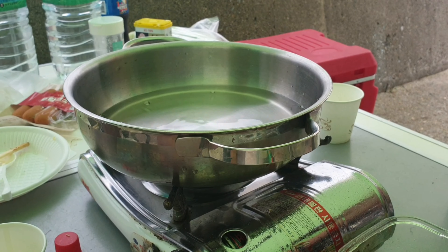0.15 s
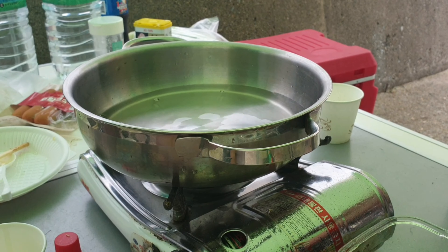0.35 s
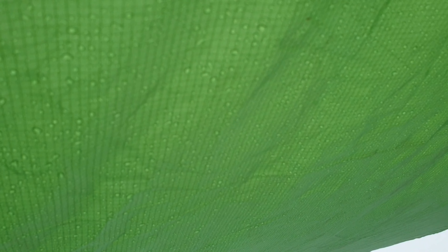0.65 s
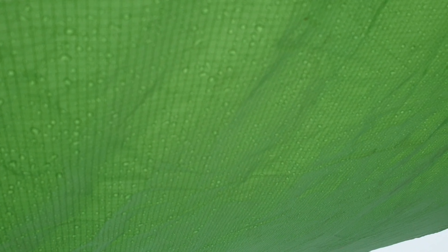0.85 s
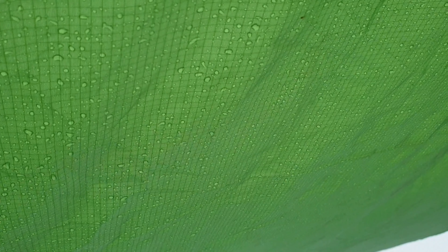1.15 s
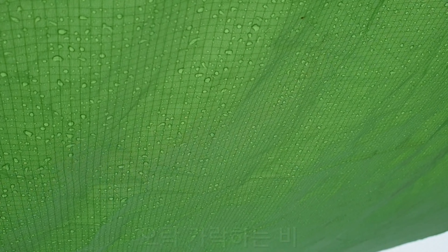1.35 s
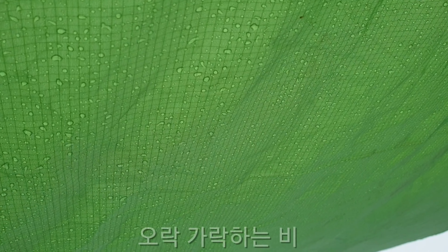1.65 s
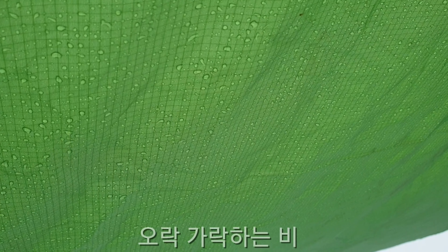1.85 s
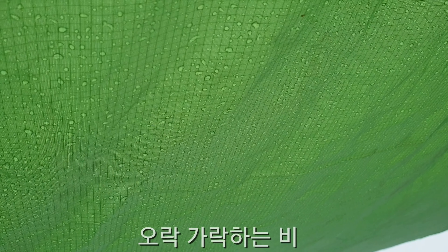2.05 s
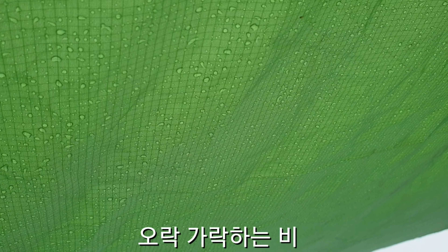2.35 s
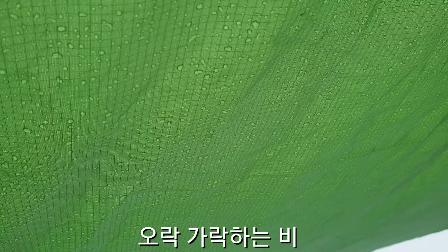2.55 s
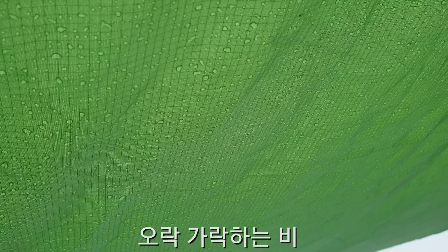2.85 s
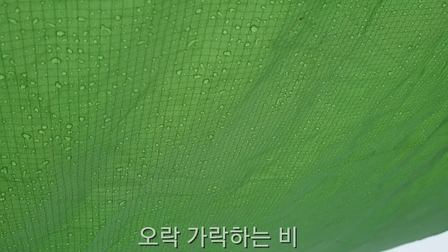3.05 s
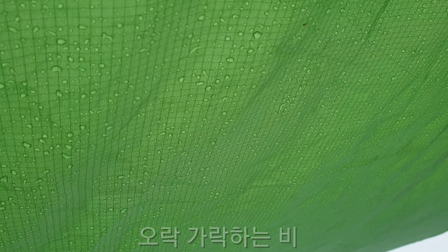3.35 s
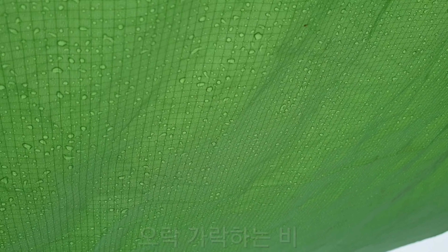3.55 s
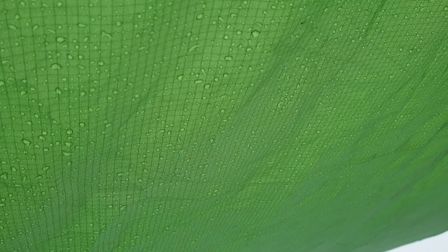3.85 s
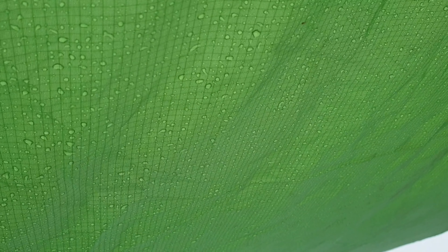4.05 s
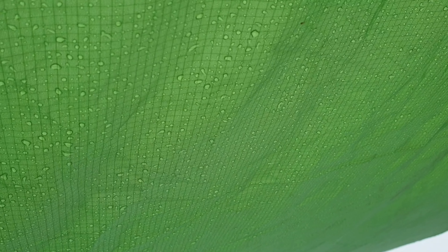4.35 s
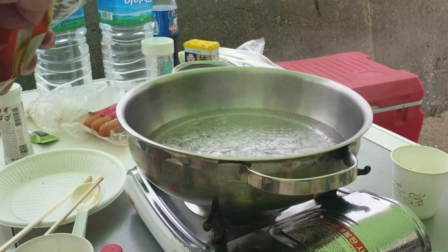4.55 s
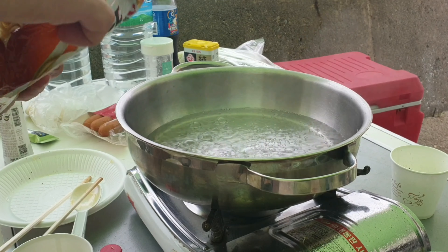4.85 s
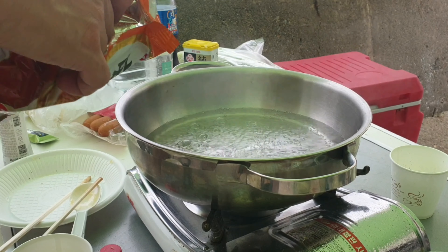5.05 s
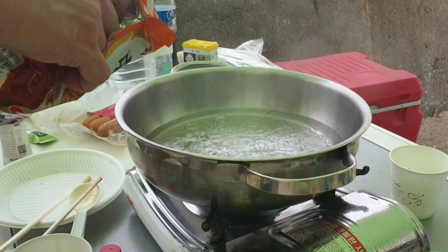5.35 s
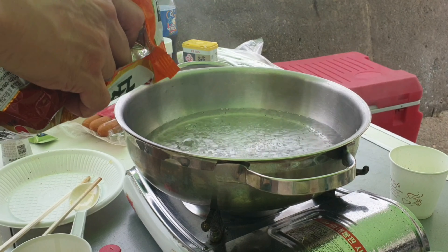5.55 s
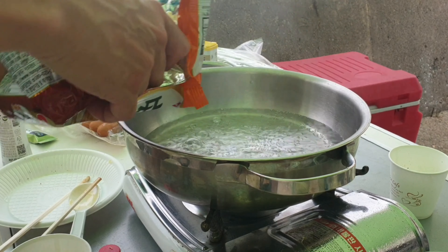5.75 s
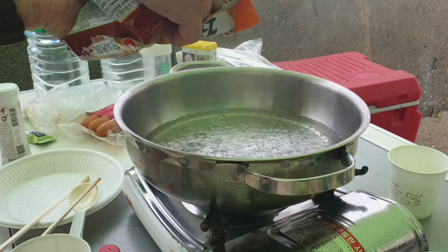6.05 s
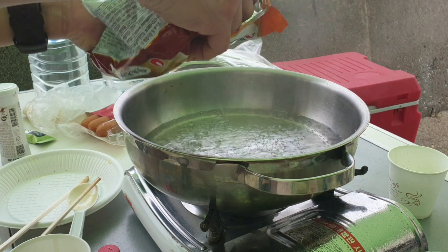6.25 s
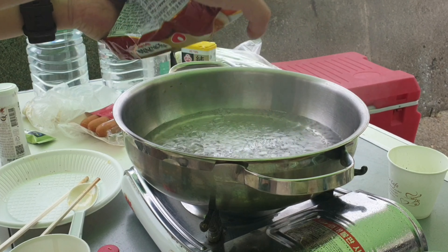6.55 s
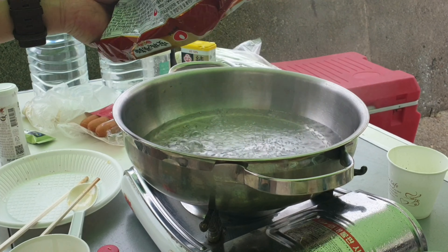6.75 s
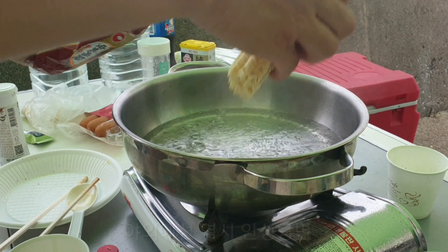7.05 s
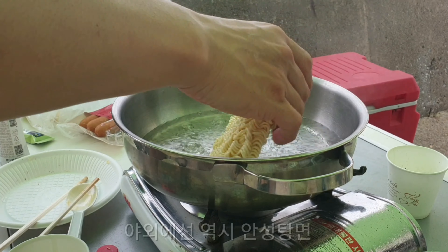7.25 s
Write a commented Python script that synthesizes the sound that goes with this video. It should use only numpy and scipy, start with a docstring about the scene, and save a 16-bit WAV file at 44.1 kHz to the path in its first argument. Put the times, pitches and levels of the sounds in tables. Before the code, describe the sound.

Outdoors in stereo, three close viewpoints join with abrupt cuts. First comes brief rain wash at a table; then faint drops beneath taut cloth, building to forceful plops, fine spray and low rumble. Finally, beside a metal pot on a gas burner, water fizzes softly while stiff film crackles in uneven squeezes. One bright tear dominates, fading into small rustles, quiet simmering and a gentle dip into water.

```python
"""A rainy camp kitchen, heard from three places in turn: at the table, close under the tarp, beside the pot.
Rain is drumming pulses and filtered noise; under the cloth its level fades up, with single drops and a low boom.
At the pot a gas burner hisses and whistles, and bubbles burst as damped tones of rising pitch.
A plastic noodle packet crinkles in clumps of tiny rings and clicks, snaps, and rips open as bursts of noise;
the hollow of the steel pot rings along, and at last the noodles meet the water with a soft slosh."""
import sys
import numpy as np
from scipy import signal
from scipy.fft import rfft, irfft, next_fast_len
from scipy.io import wavfile
from scipy.ndimage import map_coordinates

SR = 44100
rng = np.random.default_rng(int(sys.argv[2]) if len(sys.argv) > 2 else 0)


def dump_mix(stems):
    """Bounce the given channels to the path in sys.argv[1] as a 16-bit WAV at rate SR."""
    frames = np.atleast_2d(stems).T  # one column per channel
    limited = np.clip(frames, -1, 1)  # hard clip at full scale
    pcm = np.round(limited * 32767).astype(np.int16)
    wavfile.write(sys.argv[1], SR, pcm)


N = 326781
TIME = np.arange(N) / SR  # s

# when each place is heard: start and end, s
AT_TABLE, UNDER_TARP, AT_POT = (-.1, .534), (.563, 4.616), (4.637, 7.6)
REFERENCE_DB = -40  # patter level from which drops and rumble are scaled

# the patter's level fades up under the tarp; spray, lesser drops and rumble rise with it: t/s, level/dB
PATTER_LEVEL = [(0.58, -62.5), (1.1, -63), (1.55, -60.5), (2.25, -59.5), (2.92, -47), (3.42, -42),
                (4.5, -39.5), (4.6, -40.5)]
# shape of low rumble, from cloth or flame: f/Hz, level/dB
RUMBLE = [(13, -27), (22, -19), (46, -2.5), (70, 1.5), (124, -3.5), (140, -5), (210, -11), (270, -38),
          (460, -120)]
# shape of crisp film crackle: f/Hz, level/dB
CRINKLE = [(1290, -33), (2200, -6), (3140, 0), (3420, 0.5), (7030, 2.5), (8950, -3), (11100, 0.5),
           (15100, -2), (16000, -23)]
# shape of the duller rustle of wide film panels: f/Hz, level/dB
FLEX = [(200, -25), (450, -6), (650, -3), (1100, 1), (2000, -1.5), (3000, -2), (6000, -32)]


def amp(db):
    """Decibels to gain."""
    return 10 ** (np.asarray(db) / 20)


def unit(x):
    """Scale to rms 1."""
    return x / np.sqrt(np.mean(x ** 2) + 1e-20)


def along(points, hz):
    """Read (Hz, value) points on a log frequency axis."""
    f, v = np.transpose(points)
    return np.interp(np.log(hz + 1), np.log(f + 1), v)


def curves(rows):
    """One value per sample for each column after the time."""
    s, *cols = np.transpose(rows)
    return [np.interp(TIME, s, c) for c in cols]


def wobble(rate):
    """A smooth random curve with this many knots a second."""
    knots = rng.standard_normal(int(N * rate / SR) + 4)
    return map_coordinates(knots, [TIME * rate])


def pan(db):
    """Left and right gains of constant power; positive dB leans left."""
    g = amp(np.array([np.atleast_1d(db), -np.atleast_1d(db)]) / 2)
    return g / np.sqrt(np.mean(g ** 2, axis=0))


def add(track, s, sound):
    """Mix a stereo sound in at time s."""
    i = max(round(s * SR), 0)
    track[:, i:i + sound.shape[1]] += sound[:, :max(N - i, 0)]


def filtered(x, response):
    """Multiply the spectrum of x by a complex response of frequency."""
    m = next_fast_len(N + SR // 4)
    return irfft(rfft(x, m) * response(np.fft.rfftfreq(m, 1 / SR)), m)[..., :N]


def convolved(x, kernel):
    """Convolve each channel with its kernel and keep the scene's length."""
    return signal.oaconvolve(x, kernel, axes=1)[:, :N]


def colour(x, points, size=4096):
    """Causal minimum-phase filter of the given (Hz, dB) shape, made by folding the cepstrum."""
    gain = amp(along(points, np.fft.rfftfreq(size, 1 / SR)))
    cepstrum = irfft(np.log(gain + 1e-6))
    fold = np.r_[1, np.full(size // 2 - 1, 2), 1, np.zeros(size // 2 - 1)]
    kernel = irfft(np.exp(rfft(cepstrum * fold)))
    return convolved(x, kernel[None])


def heard_at(span):
    """1 while a place is heard, with steep fades outside its span."""
    fade_db_per_s = 1500
    outside = np.maximum(np.maximum(span[0] - TIME, TIME - span[1]), 0)
    return amp(-np.minimum(fade_db_per_s * outside, 200))


def noise(alike):
    """Stereo white noise whose sides share a fraction of their power, 0-1."""
    shared = np.sqrt(alike) * rng.standard_normal(N)
    return shared + np.sqrt(1 - alike) * rng.standard_normal((2, N))


def air(spectrum):
    """Diffuse noise of rms 1: nearly mono in the bass, unrelated in the treble."""
    # likeness of diffuse sound at the two microphones: f/Hz, shared power/0-1
    likeness = [(40, 1), (150, 0.86), (400, 0.67), (900, 0.09), (3000, 0.02)]
    common = filtered(noise(1.0), lambda hz: np.sqrt(along(likeness, hz)))
    separate = filtered(noise(0), lambda hz: np.sqrt(1 - along(likeness, hz)))
    return unit(colour(common + separate, spectrum))


def grains(rate, scatter_db, width_db, lead_ms=0, lag_ms=.2):
    """Random impulses of rms 1, each with its own size, side and delay between the microphones."""
    count = int(rate * N / SR)
    size, side, lag = rng.standard_normal((count, 3)).T
    at = rng.integers(0, N, count)
    late = np.round((lead_ms + lag_ms * lag) * SR / 1000).astype(int)
    left, right = amp(scatter_db * np.minimum(size, 2)) * pan(width_db * side)
    train = np.array([np.bincount(at, left, N), np.bincount((at + late) % N, right, N)])
    return unit(train - train.mean(axis=1, keepdims=True))


def pings(span, rate, low_hz, high_hz, t60, scatter_db):
    """Tiny damped rings at random times, each with its own pitch, size and side; rms 1 over the span."""
    length = span[1] - span[0]
    rows = rng.random((int(rate * length), 4))
    when, pitch, side, turn = rows.T[:, :, None]
    size = amp(scatter_db * np.minimum(rng.standard_normal(when.shape), 2))
    t = np.arange(int(t60 * SR)) / SR
    at = ((span[0] + when * length + t) * SR).astype(int).clip(0, N).ravel()
    phase = 2 * np.pi * (low_hz + pitch * (high_hz - low_hz)) * t
    fall = size * amp(-60 * t / t60)
    left = fall * amp(8.8 * (side - .5)) * np.sin(phase)
    right = fall * amp(10.5 * (.5 - side)) * np.sin(phase + 2 * np.pi * turn)
    pair = np.array([np.bincount(at, v.ravel(), N + 1)[:N] for v in (left, right)])
    return unit(pair) * np.sqrt(length * SR / N)


def arrivals(span, rate, count=100):
    """Irregular times within a span at a steady or changing rate a second."""
    due = np.cumsum(rate * heard_at(span)) / SR
    turns = np.arange(count) + rng.uniform(0, 2, count)
    return np.interp(turns[turns < due[-1]], due, TIME)


def around(x, wet_db, count=5):
    """Short reflections off table and wall: random decaying tails that take turns every 25 ms."""
    # decay of the reflections: f/Hz, t60/s
    decay = [(200, 0.044), (2000, 0.1), (12000, 0.051)]
    hz, t, z = signal.stft(rng.standard_normal((count, 2, SR // 5)), SR, nperseg=256)
    fall = amp(-60 * t / along(decay, hz)[:, None])
    tails = signal.istft(z * fall, SR, nperseg=256)[1]
    spot = (TIME * 40).astype(int) % count
    echo = np.zeros((2, N))
    for k, tail in enumerate(tails):
        echo += convolved(x * (spot == k), tail / np.linalg.norm(tail[0]))
    return x + amp(wet_db) * np.roll(echo, SR // 1000, axis=1)  # 1 ms later


def rumble():
    """Low, nearly mono rumble: the tarp's rises with the patter level; at the pot, open air and flame waver."""
    # rumble of open air and flame at the pot: t/s, level/dB
    burner = [(4.8, -50), (5.2, -46.5), (5.6, -52), (6.2, -45), (7.4, -47.5)]
    under_db, slope = -5, 0.94  # against the patter at reference level; dB per dB of patter
    tarp_db = REFERENCE_DB + under_db + slope * (curves(PATTER_LEVEL)[0] - REFERENCE_DB)
    level = amp(tarp_db) * heard_at(UNDER_TARP) + amp(curves(burner)[0]) * heard_at(AT_POT)
    return level * unit(colour(noise(0.91), RUMBLE)) * pan(-2.1)


def billow():
    """The laden cloth heaves once: a low boom that fades slowly."""
    start_s, level_db, fade_db_per_s = 3.28, -41, 17
    t = np.maximum(TIME - start_s, 0)
    boom = amp(level_db - fade_db_per_s * t) * (1 - np.exp(-t / .02))
    return boom * unit(colour(noise(0.92), RUMBLE)) * pan(-2.2)


def push(contact_ms, size=400):
    """A drop pushes the cloth: a sharp pressure peak, then a slower suction."""
    u = np.arange(size) / SR * 1000 / contact_ms
    pulse = u * (1 - u / 2) * np.exp(-u)
    return pulse / pulse.max()


def drumming(rate, scatter_db):
    """Many drops on the cloth; the big slow ones sound dull, the small ones bright."""
    sizes = [(.22, -1.5), (0.094, -4.0), (0.057, -2.5)]  # contact time/ms, level/dB
    total = np.zeros((2, N))
    for contact_ms, db in sizes:
        hits = grains(rate, scatter_db, 3.2, lead_ms=.25)
        total += amp(db) * unit(convolved(hits, push(contact_ms)[None]))
    return unit(total)


def table_rain():
    """Rain heard from the table: a low wash, with drumming overhead that gets a little louder."""
    # shape of the wash: f/Hz, level/dB
    wash_shape = [(15, -35), (25, -10), (120, 0), (326, -13.5), (659, -8), (887, -13), (1290, -8),
                  (1440, -19), (1740, -13.5), (3520, -20), (7310, -20), (8360, -24.5), (14000, -22.5),
                  (16000, -31)]
    louder = amp(np.interp(TIME, AT_TABLE, [-2, 2]))
    wash = amp(-38.0 + 1.2 * wobble(32.0)) * air(wash_shape)
    drums = amp(-44.0) * drumming(rate=60, scatter_db=5.0)
    rings = amp(-54.0) * pings(AT_TABLE, 150, 520, 1640, t60=0.017, scatter_db=12)
    return (wash + (drums + rings) * louder) * pan(-1.5) * heard_at(AT_TABLE)


def lesser_drops(count=100):
    """Random drops, in the form of the heavy ones: their rate and level rise with the patter level."""
    rate, rate_slope, level_slope = 17, .35, 0.76  # a second at reference level; dB per dB of patter
    level_db, spread_db, splash_db = -20, 2, -6  # at reference level; scatter; splash against the push
    usual_contact_ms, side_db, side_spread_db = 0.11, -4.5, 3.5
    patter_db = curves(PATTER_LEVEL)[0] - REFERENCE_DB
    chance = rng.standard_normal((count, 4)).clip(-2, 2)
    times = arrivals(UNDER_TARP, rate * amp(rate_slope * patter_db))
    rows = []
    for s, (size, contact, splash, side) in zip(times, chance):
        db = level_db + level_slope * np.interp(s, TIME, patter_db) + spread_db * size
        contact_ms = usual_contact_ms * np.exp(.3 * contact)
        rows.append((s, db, contact_ms, db + splash_db + 3 * splash, side_db + side_spread_db * side))
    return rows


def heavy_drops():
    """Single near drops: a push on the cloth, a tick of splashing water and a smaller rebound."""
    # drops that stand out, levels and side before the trims below:
    # t/s, push level/dB, contact time/ms, splash level/dB, left over right/dB
    near_drops = [(0.2077, -17.5, 0.15, -32, -4), (0.2366, -14, 0.034, -25, -4), (0.4287, -16, 0.1, -28, 1),
                  (0.8388, -33.5, 0.1, -48, -12), (1.0643, -32.5, 0.16, -52, 0),
                  (1.2012, -27.5, 0.12, -45, 2), (1.3294, -34, 0.16, -49, -7),
                  (1.433, -31, 0.12, -34.5, -9), (1.459, -35, 0.089, -31.5, -8.5),
                  (1.5543, -35, 0.1, -46, -1), (1.7244, -34, 0.15, -34.5, 7), (1.7669, -31, 0.054, -36, -6),
                  (1.9603, -30, 0.11, -49, -3), (2.1317, -25.5, 0.14, -48, -2),
                  (2.2297, -28, 0.12, -28.5, -1), (2.38, -24, 0.17, -31.5, 0),
                  (2.4066, -26.5, 0.12, -34, 0), (2.6992, -20.5, 0.1, -32, -6), (2.744, -21, 0.11, -30, -2),
                  (2.7927, -20.5, 0.096, -29, -5), (2.965, -19.5, 0.09, -25, -9),
                  (3.027, -15.5, 0.086, -26.5, 4), (3.139, -15.5, 0.081, -23, -4),
                  (3.2227, -12, 0.095, -22, -6.5), (3.2326, -13.5, 0.1, -24, -2),
                  (3.4606, -12, 0.11, -21, -4), (3.5576, -12, 0.1, -14.5, -5),
                  (3.6181, -17.5, 0.15, -17.5, -6), (3.6746, -14, 0.13, -27, -13),
                  (3.6843, -12, 0.1, -19.5, -5), (4.039, -11, 0.1, -26, -1), (4.1164, -13, 0.061, -17.5, 1),
                  (4.1844, -19, 0.18, -19, -6), (4.3998, -12.5, 0.12, -27, -14),
                  (4.4406, -13.5, 0.066, -26, -9), (4.517, -6.5, 0.076, -20, -1)]
    out, t = np.zeros((2, N)), np.arange(700) / SR
    for s, db, contact_ms, splash_db, side_db in [*near_drops, *lesser_drops()]:
        fall = amp(-60 * t / 0.0037) + 0.48 * amp(-60 * t / 0.025)
        splash = amp(splash_db - 5.5) * rng.standard_normal((2, len(t))) * fall
        drop = (amp(db - 2.5) * push(contact_ms, size=len(t)) + splash) * pan(side_db + 4.5)
        late, rebound_s = rng.integers(4, 18), rng.uniform(.002, .006)
        # the left microphone hears it a few samples before the right
        pair = np.array([np.pad(drop[0], (0, late)), np.pad(drop[1], (late, 0))])
        add(out, s - .0003, pair)
        add(out, s + rebound_s, amp(-11) * pair)
    return out


def tarp_rain():
    """Close under the cloth: single drops, sparse stronger taps, drumming, a far wash and fine spray."""
    # shape of the far patter: f/Hz, level/dB
    patter_shape = [(88, -32.5), (150, -3.5), (352, 2.5), (496, -6.5), (601, 3.5), (671, -2.5),
                    (1150, -2.5), (4000, -7.5), (5200, -41), (8800, -120)]
    # shape of the fine spray: f/Hz, level/dB
    spray_shape = [(1200, -17), (3000, -6), (4500, 0), (7000, -2), (8500, -3), (12000, -1), (16000, -5)]
    # ringing of the right microphone port with sound from overhead: f/Hz, gain/dB
    port = [(100, 1.5), (500, 1.5), (1500, 4), (4000, 4), (5700, 10.5), (7200, 10.5), (8300, 0.5),
            (9800, 3), (11800, 7), (13500, 2.5)]
    spray_over_db = -0.8  # against the patter level
    patter_db, = curves(PATTER_LEVEL)
    wash = amp(patter_db - 1.45 + 0.81 * wobble(25.04)) * air(patter_shape)
    drums = amp(patter_db - 3.5) * drumming(rate=130, scatter_db=5.5)
    taps = amp(patter_db - 4.5) * drumming(rate=14, scatter_db=4.0)
    rings = pings(UNDER_TARP, 1200, 1870, 16000, t60=.0027, scatter_db=4.5)
    droplets = grains(2200, 3.8, 6.3) + .7 * rings + .5 * noise(0)
    spray_level = amp(patter_db + spray_over_db + 0.73 * wobble(13))
    spray = spray_level * unit(colour(droplets, spray_shape))
    # the wet cloth softens the top of every impact
    cloth = [(150, 1.0), (400, 0), (700, 0.0), (2000, -0.5), (7000, 0.0), (10000, -4), (16000, -6.0)]
    impacts = colour((drums + taps) * heard_at(UNDER_TARP) + heavy_drops(), cloth)
    left, right = around((wash + spray) * heard_at(UNDER_TARP) + impacts, wet_db=-9.5)
    return np.array([left, colour(right[None], port)[0]])


def thumps():
    """Soft, heavily damped low knocks: two tones each."""
    # thumps of the cloth, and last the noodles meeting the water: t/s, level/dB, f/Hz
    knocks = [(3.31, -25.5, 103), (3.744, -26.5, 271), (3.783, -34, 340), (7.379, -33, 170)]
    out, t = np.zeros((2, N)), np.arange(SR // 5) / SR
    for s, db, hz in knocks:
        upper = np.sin(2 * np.pi * hz * 1.37 * t + rng.uniform(0, 2 * np.pi))
        swing = np.sin(2 * np.pi * hz * t) + .5 * upper
        envelope = (1 - np.exp(-t / 0.0061)) * amp(-60 * t / 0.11)
        add(out, s, amp(db + 0.5) * swing * envelope * pan(-3.5))
    return out


def bubbles(count=300):
    """Steam bubbles burst as short damped tones with a rising pitch."""
    out, t = np.zeros((2, N)), np.arange(SR // 30) / SR
    times = rng.uniform(AT_POT[0], N / SR, size=count)
    for s, (pitch, size, side) in zip(times, rng.standard_normal((count, 3))):
        cycles = 1100 * np.exp(.6 * pitch) * t
        envelope = np.exp(-cycles / 2.1) * (1 - np.exp(-2 * cycles))
        pop = np.sin(2 * np.pi * cycles * (1 + 6 * t)) * envelope
        add(out, s, amp(-54 + 2.5 * size) * pop * pan(3 * side))
    return out


def simmer():
    """Pot and burner: bursting bubbles, a noise hiss, a fizz of damped rings and a thin unsteady whistle."""
    # shape of the burner's hiss: f/Hz, level/dB
    hiss_shape = [(120, -19), (220, 0.5), (320, 1.5), (480, -3), (650, -6.5), (850, -9.5), (1200, -10),
                  (2500, -11.5), (5000, -15.5), (7000, -14), (9000, -20.5), (12000, -18.5), (16000, -22)]
    hiss_db, whistle_db, waver_hz = -52, -71, 35
    hiss = amp(hiss_db + 1.66 * wobble(9)) * air(hiss_shape)
    fizz = amp(-64.5) * pings(AT_POT, 410, 1030, 8000, t60=0.0083, scatter_db=6)
    whistle_phase = 2 * np.pi * np.cumsum(4800 + waver_hz * wobble(90)) / SR
    whistle = amp(whistle_db + 3 * wobble(6)) * np.sin(whistle_phase) * pan(-12)
    return (bubbles() + hiss + fizz + whistle) * pan(-1.3) * heard_at(AT_POT)


def noodles():
    """The dry block is dipped into the water: a short, soft slosh of noise."""
    swell = np.exp(-((TIME - 7.388) / 0.016) ** 2)
    slosh = [(100, -13), (250, -3), (700, 1), (1200, -11), (2100, -6), (3500, -23), (9000, -24)]
    return amp(-46.5) * swell * air(slosh)


def effort():
    """Crinkle and flex levels in dB: every squeeze builds, holds and relaxes in the same way."""
    # hands squeeze and pull the packet: t/s, length/s, crinkle level/dB, flex against crinkle/dB
    squeezes = [(4.645, 0.027, -36.5, -5.5), (4.76, .05, -44.5, -3.5), (4.95, 0.11, -42, -2),
                (5.055, 0.049, -35.5, -5), (5.16, 0.056, -35.5, -5), (5.27, 0.059, -39.5, -7.5),
                (5.48, 0.018, -41.5, -6), (5.76, 0.023, -44.5, -9), (5.89, .04, -38.5, -4.5),
                (6.0, 0.084, -36, -4.5), (6.243, 0.01, -36, -15), (6.32, 0.028, -37.5, -10),
                (6.44, 0.077, -39, 0), (6.625, 0.045, -39.5, -4), (6.725, 0.026, -39.5, -2.5),
                (6.82, 0.12, -51.5, 0.5)]
    grip_db_per_s, relax_db_per_s = 343, 173
    # the packet also rustles faintly while it is turned over
    turning = (4.65, 5.53 - 4.65, -50.5, -4)
    crinkle_db = flex_db = np.full(N, -90.)
    for s, length, db, flex in [*squeezes, turning]:
        before, after = np.maximum(s - TIME, 0), np.maximum(TIME - s - length, 0)
        level = db - grip_db_per_s * before - relax_db_per_s * after
        crinkle_db = np.maximum(crinkle_db, level)
        flex_db = np.maximum(flex_db, level + flex)
    return crinkle_db, flex_db


def buckling(count=400):
    """Clumping gain: each run of buckling facets sets in at once and dies away over a steady rustle."""
    rate, t60, steady = 85, 0.052, 0.69  # runs a second, s, power of the rustle between runs
    at = (arrivals(AT_POT, rate, count=count) * SR).astype(int)
    strength = amp(5 * rng.standard_normal(count).clip(-2, 2))
    runs = np.bincount(at, strength[:len(at)], N)
    power = signal.lfilter([1], [1, -amp(-120 / (t60 * SR))], runs)
    power /= np.average(power, weights=heard_at(AT_POT))
    return np.sqrt((power + steady) / (1 + steady))


def crinkle():
    """Tiny facets of film buckle in clumps, each at its own pitch; wider panels flex with a duller rustle."""
    crinkle_db, flex_db = effort()
    clumps = buckling() * amp(0.95 * wobble(240))
    rings = pings(AT_POT, 3000, 1570, 15800, t60=0.0041, scatter_db=1.5)
    facets = rings + 0.88 * grains(1500, 2.6, 5.5) + 0.62 * noise(0)
    panels = unit(grains(1100, 4.3, 4.7) + 0.44 * noise(0))
    ticks = amp(crinkle_db - 2.6) * colour(facets, CRINKLE) * pan(0.72)
    flex = amp(flex_db - 3.5) * unit(colour(panels, FLEX)) * pan(-0.66)
    return (ticks + flex) * clumps * heard_at(AT_POT)


def small_creases(count=100):
    """Random snaps whose strength follows the squeezes."""
    rate, over_db, spread_db, usual_dull_db = 22, 3.5, 3.5, -5.5  # a second; over the crinkle; scatter
    crinkle_db = effort()[0]
    chance = rng.standard_normal((count, 3)).clip(-2, 2)
    rows = []
    for s, (size, dull, side) in zip(arrivals(AT_POT, rate), chance):
        db = np.interp(s, TIME, crinkle_db) + over_db + spread_db * size
        rows.append((s, db, usual_dull_db + 6 * dull, 3 * side))
    return rows


def snaps():
    """Larger creases flip over with a crack and a brief flutter."""
    # loudest creases, before the trims below: t/s, level/dB, dull against bright/dB, left over right/dB
    creases = [(4.6427, -35, 2, 0), (4.69, -29, -17, 2), (5.072, -28.5, -6, 4), (5.1623, -33, 3, 0),
               (5.2144, -31, -2, 2), (5.3273, -29.5, -11, 3), (5.373, -31, -24, 0), (5.4824, -35, 0, -1),
               (5.6993, -35.5, -16, 1), (5.7956, -40, -25, 3), (6.0065, -28.5, -10, 1),
               (6.207, -28, -7.5, -1), (6.237, -33, -17, -4), (6.2483, -24.5, -24, -7), (6.48, -28, 2, -1),
               (6.5204, -33, -3, -2), (6.5528, -27.5, -0.5, -2), (6.591, -32.5, -11, -1),
               (6.6192, -26, 1.5, -1), (6.721, -26.5, -1.5, 0), (6.8714, -36, 1, 1), (7.073, -42.5, 15, -1),
               (7.1225, -41, -6, 1)]
    bright, dull, t = np.zeros((2, N)), np.zeros((2, N)), np.arange(SR // 25) / SR
    for s, db, dull_db, side_db in [*creases, *small_creases()]:
        fall = 0.65 * amp(-60 * t / 0.0051) + 0.39 * amp(-60 * t / 0.038)
        crack = rng.standard_normal((2, len(t))) * fall
        crack = amp(db + 8.5) * crack * pan(side_db) / np.hypot(1, amp(dull_db))
        add(bright, s, crack)
        add(dull, s, amp(dull_db + 6.5) * crack)
    return colour(bright, CRINKLE) + colour(dull, FLEX)


def tear():
    """The seam gives way in one bright rip; the opened bag then puffs out."""
    # shape of the rip: f/Hz, level/dB
    rip_shape = [(150, -8), (600, -14.5), (2000, -3), (4500, -1.5), (7000, 1.5), (8500, -2.5), (12000, 1.5),
                 (14500, 0), (16000, -15)]
    t = np.maximum(TIME - 6.3642, 0)
    seam = (1 - np.exp(-(t / 0.0014) ** 2)) * amp(-60 * t / 0.18 + 0.87 * wobble(300))
    bag = (t / 0.016) ** 2 * np.exp(2 - 2 * t / 0.018)
    rip = amp(-11) * seam * unit(colour(grains(12000, 3, 2.6) + noise(0), rip_shape)) * pan(.8)
    puff_shape = [(60, -15), (250, -4.5), (450, -6.5), (800, 0.5), (1500, 2.5), (4000, -7), (9000, -16.5)]
    return rip + amp(-22) * bag * air(puff_shape)


def packet():
    """The packet is held over the pot, whose hollow rings along as a bank of resonances."""
    # resonances of the air in the pot: f/Hz, width/Hz, relative level/dB
    pot = [(586, 29, 4), (906, 55, -11), (1010, 78, -8), (1240, 100, -8.5), (1950, 40, -2.5),
           (2225, 64, -6), (2690, 36, -10)]

    def hollow(f):
        """Sum of band-pass resonances."""
        return sum(amp(db) * 1j * f * w / (hz * hz - f * f + 1j * f * w) for hz, w, db in pot)

    film = crinkle() + snaps() + tear()
    return around(0.91 * film + amp(-5) * filtered(film, hollow), wet_db=-7)


def scene():
    """All sources, left and right."""
    rain = table_rain() + tarp_rain() + rumble() + billow() + thumps()
    return rain + simmer() + packet() + noodles()


def record(dry):
    """The recorder cuts the treble steeply above its band limit."""
    top_hz = 16000
    return filtered(dry, lambda hz: 1 / (1 + (hz / top_hz) ** 240))


dry = scene()
out = record(dry)
dump_mix(out)
```